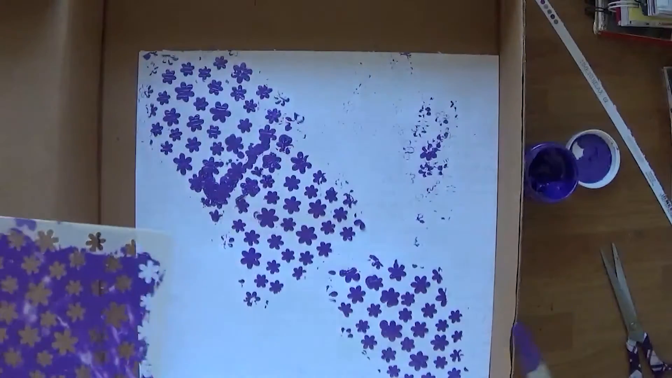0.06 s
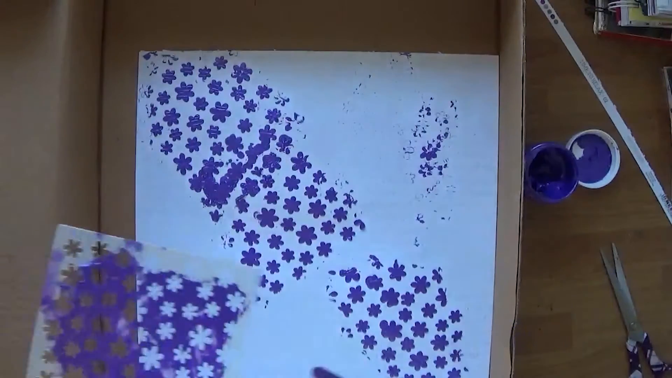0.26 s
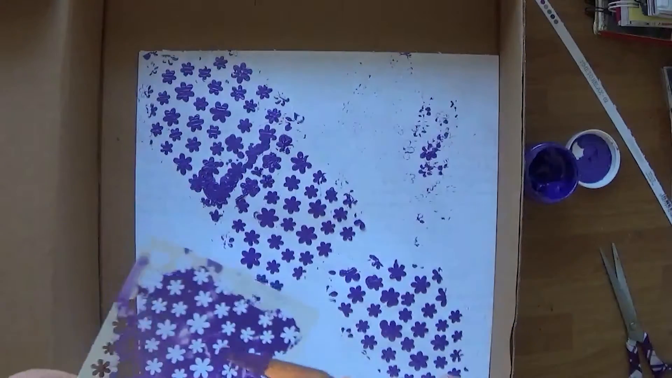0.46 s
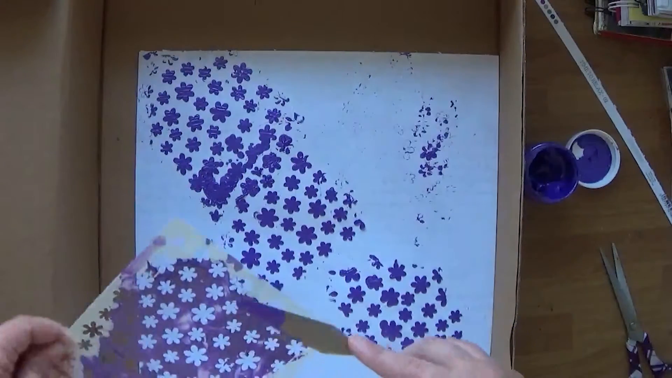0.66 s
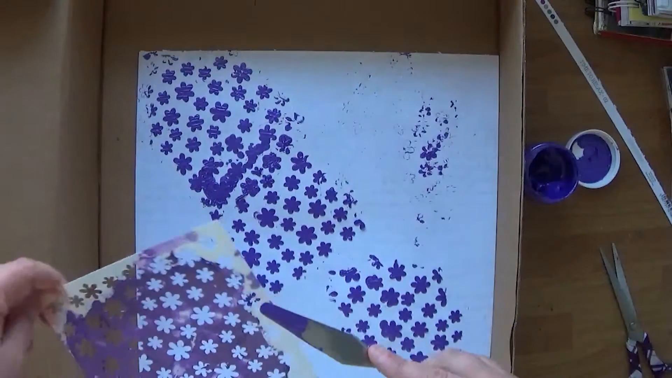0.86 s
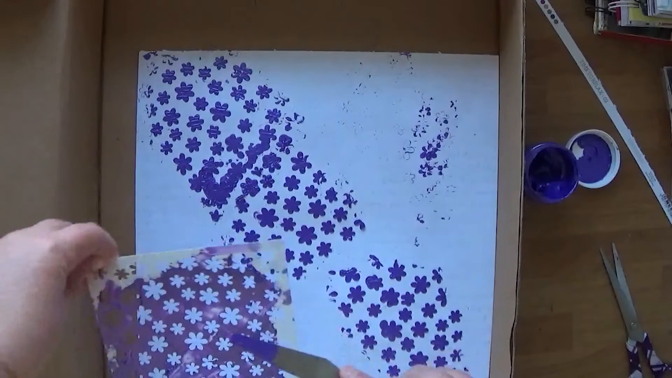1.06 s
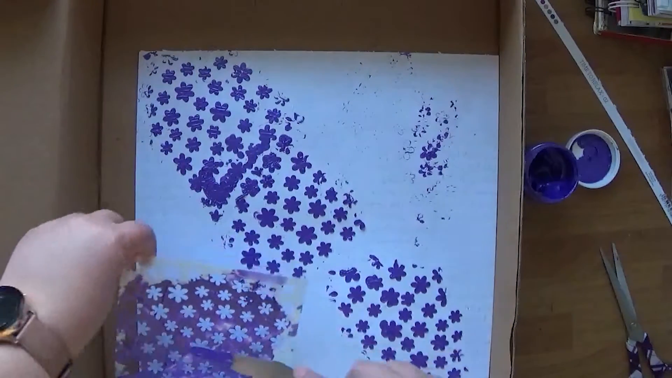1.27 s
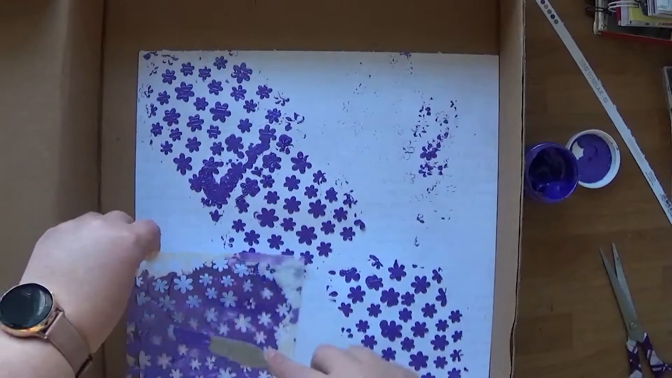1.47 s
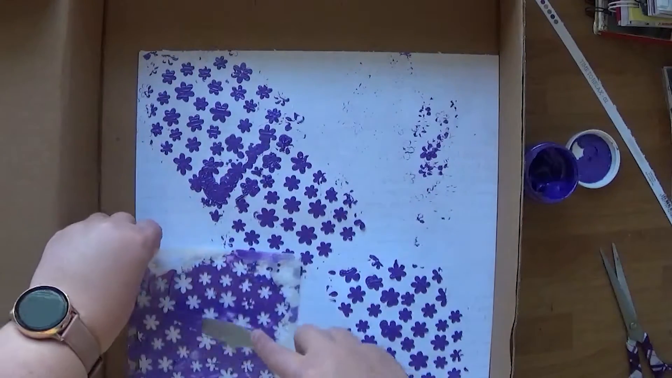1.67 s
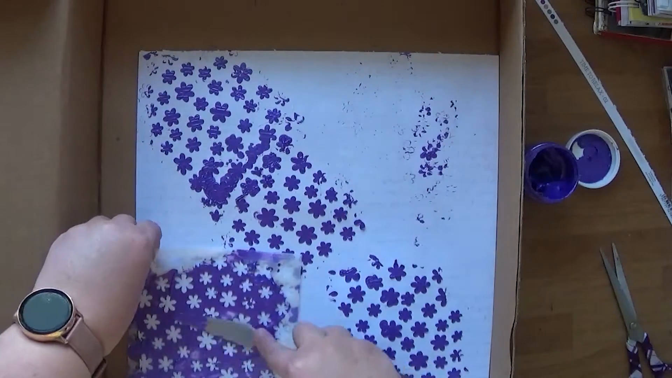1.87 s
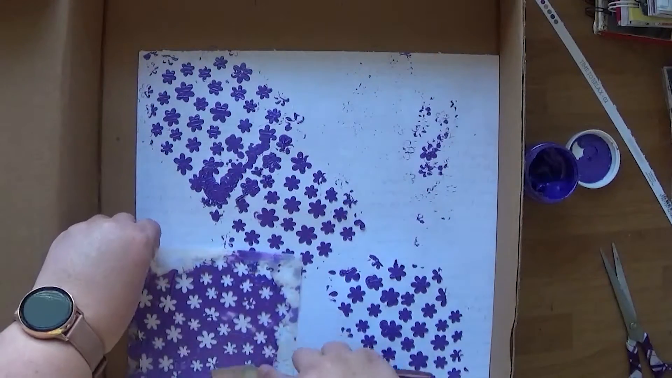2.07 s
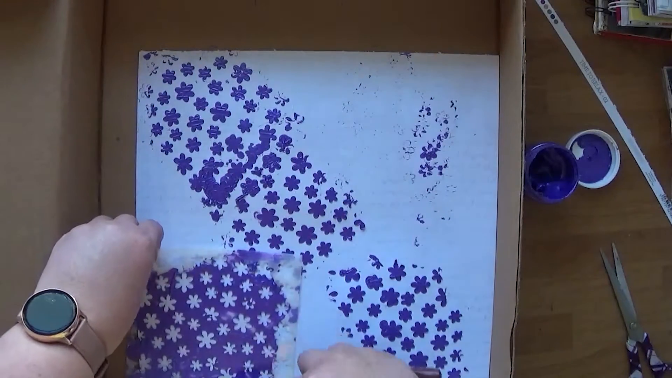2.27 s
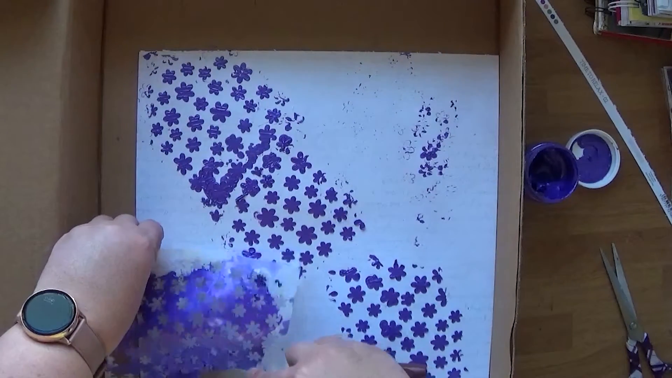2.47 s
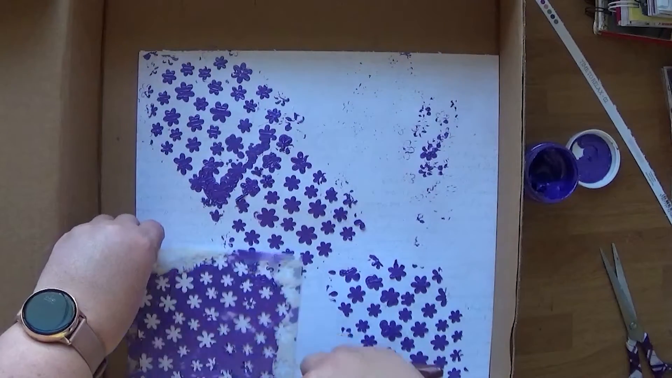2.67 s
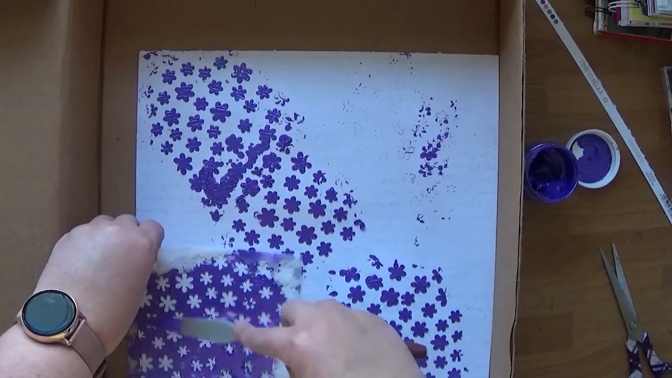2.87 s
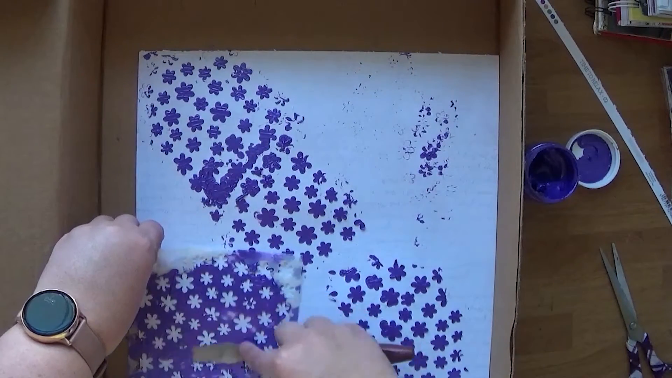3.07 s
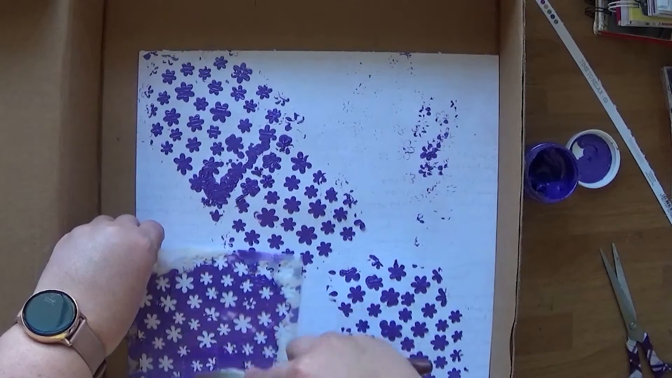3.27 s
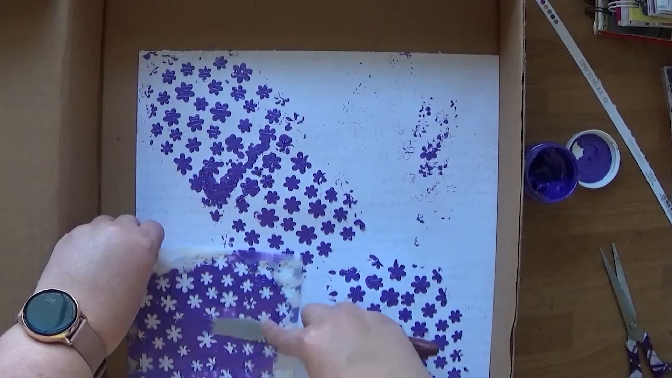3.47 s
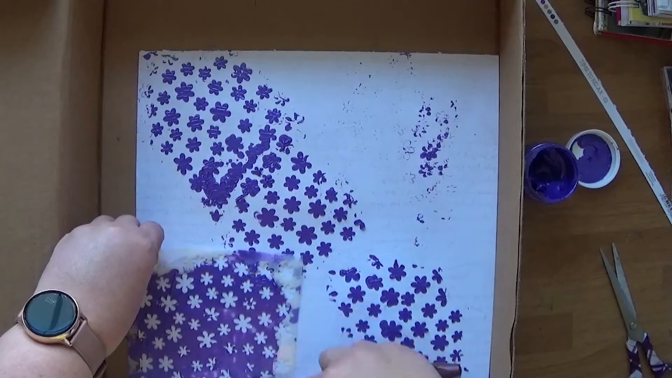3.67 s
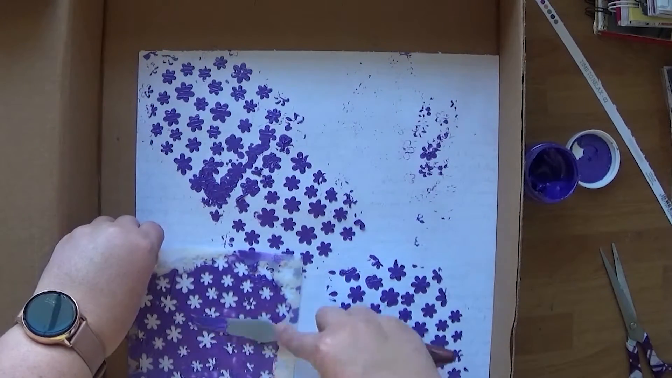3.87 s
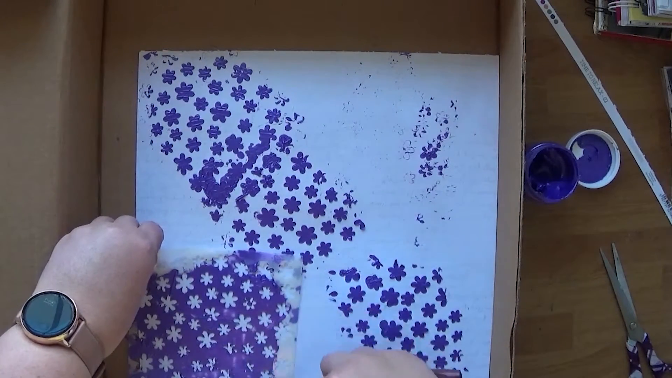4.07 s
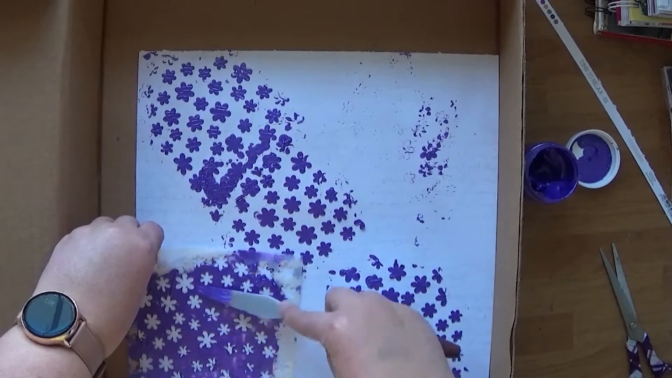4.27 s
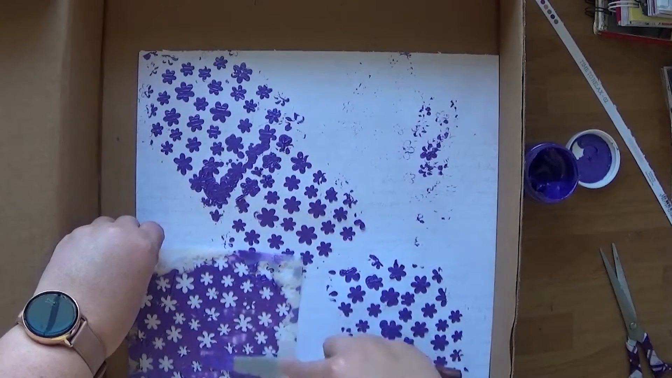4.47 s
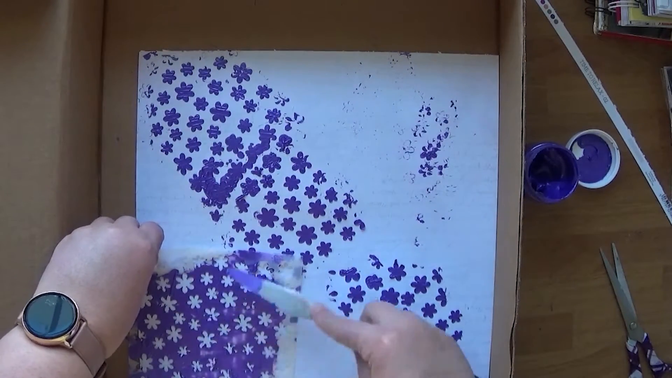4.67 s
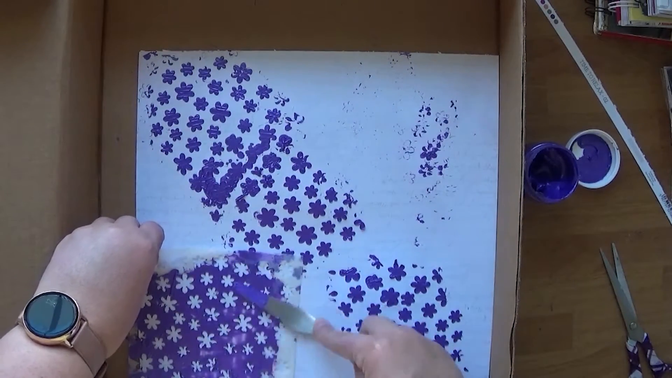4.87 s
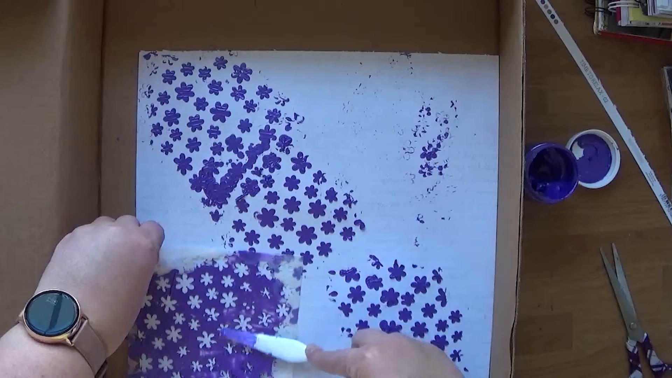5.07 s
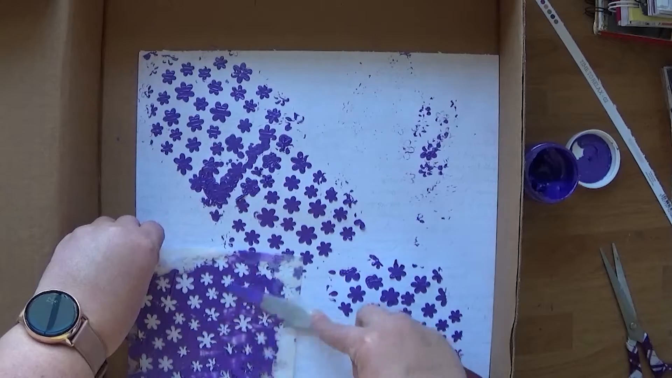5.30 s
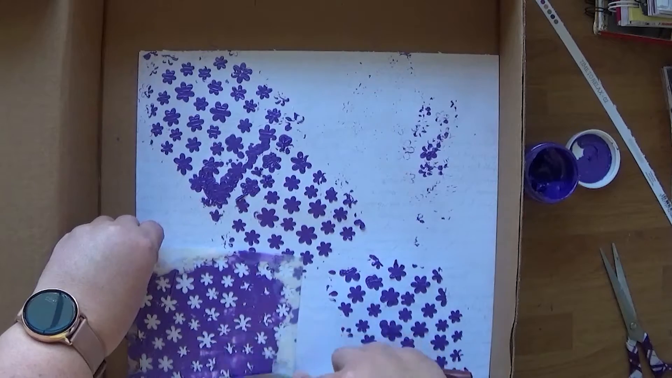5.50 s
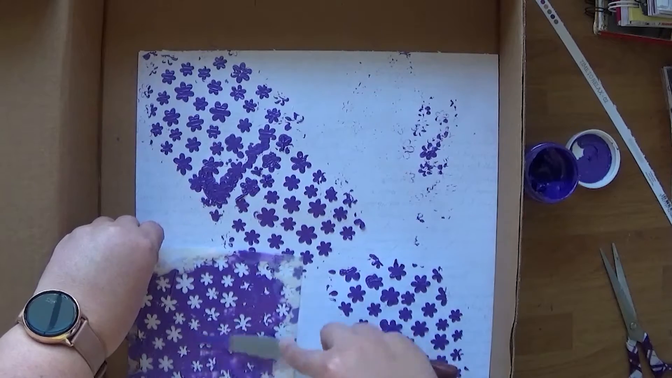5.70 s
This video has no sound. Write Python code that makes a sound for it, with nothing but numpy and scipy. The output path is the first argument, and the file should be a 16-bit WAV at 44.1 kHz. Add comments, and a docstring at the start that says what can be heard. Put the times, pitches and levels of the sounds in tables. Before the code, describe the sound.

A steady microphone hiss with a faint, rapidly pulsing buzz runs throughout and is all there is for the first second. At about 1.2 seconds a palette knife makes a light scrape over a plastic stencil on paper in a cardboard box. A longer, uneven stroke runs from 1.8 to 2.8 seconds. Near 2.7 seconds the sheet slides with one brief, faint squeak. Six shorter strokes follow, at about 3.1, 3.5, 4.0, 4.4, 4.9 and 5.4 seconds, stopping around 5.6. Each is a gritty hiss of steel and paste on plastic, dotted with sharp, slightly ringing clicks as the blade catches the cut-outs, over a hollow drumming from the cardboard. Soft low thuds of an arm on the table come irregularly from 1.3 seconds, the strongest near 2.6. Everything sounds close and nearly centred, with the short echo of a small room.

```python
"""A palette knife scrapes paste over a plastic stencil on paper in a cardboard box, under a camera.
First there is only the camera's hiss and faint buzz, which go on throughout. From 1.2 seconds the arm
thuds on the table and the blade makes eight strokes: it hisses over the plastic, clicks on the cut-outs
and drums the cardboard, and a small room answers. Near 2.7 seconds the sheet slides and squeaks once."""
import sys
import numpy as np
from scipy import signal
from scipy.fft import rfft, irfft, next_fast_len
from scipy.io import wavfile
from scipy.ndimage import map_coordinates

SR = 44100
rng = np.random.default_rng(int(sys.argv[2]) if len(sys.argv) > 2 else 0)


def inscribe(sig):
    """Save sig as 16-bit PCM at rate SR to the path in sys.argv[1].

    A 1-D sig is mono; a 2-D sig holds one channel per row.
    Samples are clipped to [-1, 1] before scaling.
    """
    pcm = np.round(np.clip(np.atleast_2d(sig).T, -1, 1) * 32767)
    wavfile.write(sys.argv[1], SR, pcm.astype(np.int16))


N = 253125
FRAMES_PER_SECOND, TOP_HZ = 29.97, 11150

# Microphone hiss. Each row: pitch in Hz, relative level in dB.
HISS_TONE = [(15, -43), (25, -12.5), (185, -1), (503, -5.5), (2280, -10), (2730, -8.5), (3190, -10.5),
             (3920, -11.5), (4450, -12.5), (10100, -18), (11500, -47), (15000, -61), (22000, -120)]
# Each row: pitch in Hz, how alike the left and right hiss are (1 is the same).
HISS_LIKENESS = [(60, 0.87), (170, 0.97), (490, 0.19), (1390, 0.073), (3950, 0.38), (11200, 0.84)]
# Camera buzz. Each row: pitch in Hz, typical peak in dB.
BUZZ_TONES = [(2770, -58), (4000, -71.5), (5400, -72)]
# Arm on the table. Each row: time in seconds, relative level in dB.
ARM_THUDS = [(1.2, -86), (1.36, -51), (1.44, -72), (1.81, -79), (1.98, -54), (2.07, -66), (2.2, -60),
             (2.29, -72), (2.39, -52), (2.49, -74), (2.56, -40.5), (2.73, -65), (2.78, -59), (2.97, -68),
             (3.07, -70), (3.42, -69), (3.47, -72), (3.58, -67), (3.87, -64), (3.93, -58), (4.03, -64),
             (4.28, -64), (4.44, -55), (4.52, -59.5), (4.6, -63), (4.84, -62), (4.89, -51.5), (5.13, -50.5),
             (5.27, -71), (5.41, -50.5), (5.74, -64)]
# One list a stroke. Each row: time in seconds, hiss and cardboard levels in relative dB,
# brightness (-3 or less is dull, 3 or more is sharp).
STROKE_SHAPES = [
    [(1.22, -64, -73, 0), (1.222, -72, -79, -6), (1.33, -45, -75, 1.5), (1.34, -49.5, -47, 2),
     (1.4, -69.5, -70, -2), (1.494, -64, -68, -2), (1.504, -73, -85, -5), (1.518, -64.5, -63, 2),
     (1.752, -71, -66, 0), (1.762, -66, -83, 4), (1.79, -71, -67, 0), (1.8, -62, -83, -2)],
    [(1.8, -74, -99, 4), (1.844, -67, -46, -2), (1.886, -70, -83, 2), (1.908, -44, -48.5, -3),
     (2.004, -56, -51, 3), (2.01, -32, -30.5, 12), (2.072, -46.5, -58.5, -1), (2.218, -45.5, -49.5, 3.5),
     (2.238, -38, -34.5, -2), (2.302, -59.5, -64, 0), (2.33, -39.5, -35, 0), (2.356, -64, -57, 4),
     (2.408, -29, -39.5, 2), (2.49, -46, -72, 4), (2.516, -42, -46, 3.5), (2.626, -36.5, -38, 2),
     (2.658, -52.5, -51, -4), (2.75, -41, -37, 5), (2.812, -67, -60.5, 0), (2.95, -67, -67, -2)],
    [(3.0, -69, -67, 0), (3.014, -71, -63, 2), (3.028, -57, -34.5, -3), (3.074, -42, -61, -2),
     (3.086, -42, -28.5, 5), (3.184, -39, -50, -1), (3.244, -42, -28.5, -2), (3.322, -73, -68, 0),
     (3.4, -67, -70, -3)],
    [(3.45, -73, -74, 0), (3.46, -71, -79, 8), (3.478, -63, -32.5, 4), (3.516, -45, -41, 4),
     (3.642, -38, -29.5, 0), (3.668, -55, -51, -6), (3.69, -40, -32.5, -3), (3.758, -61, -60, 6),
     (3.85, -70, -69, -4)],
    [(3.9, -66, -76, 0), (3.908, -75, -75, 3), (3.924, -43, -40.5, -3), (3.958, -45.5, -45, -9),
     (3.974, -42, -30, -5), (4.084, -41, -38.5, 0), (4.092, -41, -25.5, -10), (4.212, -62.5, -70.5, -2),
     (4.28, -62.5, -63, -13)],
    [(4.32, -64, -73, 0), (4.338, -66, -64, -2), (4.35, -41.5, -37.5, 0), (4.396, -56, -68, -6),
     (4.426, -41, -28.5, -8), (4.544, -42, -32.5, 0), (4.566, -64, -64, 0), (4.696, -70, -68, 0),
     (4.7, -60.5, -68, 5)],
    [(4.8, -71, -81, 3), (4.842, -43, -45.5, -7), (4.872, -63, -60, -3), (4.908, -40, -30.5, -2),
     (4.978, -44, -54, -1), (5.036, -30, -29.5, -3), (5.09, -61, -49, 3), (5.1, -31.5, -30, 1),
     (5.168, -33, -37, 2), (5.194, -54, -58, -6), (5.3, -64, -63, -3)],
    [(5.3, -68, -68, -7), (5.322, -62, -68, 0), (5.334, -46, -47, -2), (5.362, -58, -58, -2),
     (5.374, -34, -32.5, -2.5), (5.406, -34, -31.5, -1), (5.524, -38, -36, -1), (5.582, -57, -56, -17),
     (5.732, -68, -70, -2), (5.74, -58, -75, 0)],
]
# Rubbed plastic. Each row: pitch in Hz, relative level in dB.
PLASTIC_TONE = [(710, -28), (1200, -10.5), (1790, -9.5), (2460, -11), (3180, -7), (3560, -9.5),
                (8990, -10.5), (10800, -30), (11500, -46), (15000, -58), (22000, -120)]
# Cardboard notes. Each row: pitch in Hz, width in Hz, relative level in dB.
BOX_NOTES = [(235.7, 42, -10), (345, 49, 0), (483.4, 60, 3), (681, 67, -2.5), (899, 116, -3.5),
             (1089, 41, -5)]
# The blade catches an edge. Each row: start in seconds, strength in dB, ring in Hz,
# knock in dB relative to that strength, share of crack from 0 to 1.
CATCHES = [(1.276, -31, 6000, -27, 0.55), (1.3176, -27, 4800, -26, 0.55), (1.6754, -40, 1600, 4, 0.5),
           (1.8321, -28.5, 1710, -20, 0), (1.9092, -29, 1880, -23, 0.33), (1.9589, -18, 2320, -10, 0.6),
           (1.9691, -15, 2320, -5, 0.44), (2.0077, -11, 2220, -25, 0.77), (2.0392, -14, 4850, -37, 0.7),
           (2.1178, -24, 4980, -29, 0.8), (2.216, -39, 2440, -21, 0.7), (2.2303, -22, 1640, -12, 0.5),
           (2.2306, -14.5, 2610, -15, 0.53), (2.2684, -33, 2430, -14, 0.5), (2.3175, -25, 4480, -17, 0.46),
           (2.3277, -28.5, 1830, -15, 0.17), (2.3743, -27, 2900, -23, 0.63), (2.395, -5, 6100, -8, 0.69),
           (2.4078, -14, 2990, -26, 0.64), (2.4294, -27, 4020, -19, 0.5), (2.5074, -24.5, 2170, -12, 0.56),
           (2.6344, -19, 1920, -18, 0.48), (2.6758, -32, 1670, 1, 0.5), (2.7552, -19, 4800, -7, 0.65),
           (3.0265, -17.5, 2310, 0, 0.36), (3.0816, -3.5, 2490, -20, 0.46), (3.1075, -7.5, 2420, -15, 0.63),
           (3.136, -9.5, 3280, -35, 0.84), (3.1933, -20.5, 2850, -18, 0.26), (3.208, -7, 3180, -10, 0.52),
           (3.2331, -8.5, 4300, -29, 0.43), (3.474, -8, 2130, -18, 0.44), (3.5299, -2, 4640, -38, 0.5),
           (3.5516, -6.5, 2360, -29, 0.62), (3.599, -3.5, 2200, -33, 0.74), (3.6152, -8, 4420, -37, 0.52),
           (3.632, -17.5, 4500, -19, 0.12), (3.6372, -23, 1510, -15, 0.4), (3.6358, -3.5, 3250, -26, 0.54),
           (3.655, -7, 3060, -21, 0.6), (3.6633, -4, 5270, -38, 0.6), (3.6714, -6, 4200, -19, 0.6),
           (3.6847, -9, 4420, -17, 0.66), (3.7114, -21, 1700, -25, 0.44), (3.923, -25, 1830, 3.5, 0.5),
           (3.9691, -12.5, 1840, -17, 0.53), (3.9822, -9.5, 1700, -23, 0.6),
           (4.0025, -5.5, 2310, -24, 0.59), (4.0439, -6.5, 3270, -26, 0.5), (4.0655, -12, 3040, -26, 0.54),
           (4.0768, -16, 2860, -23, 0.5), (4.0874, -0.5, 3290, -25, 0.62), (4.1034, -6, 3100, -18, 0.7),
           (4.122, -15, 2490, -18, 0.58), (4.348, -22, 1860, -13, 0.54), (4.4109, -14, 2000, -27, 0.24),
           (4.4203, 0.5, 2970, -19, 0.57), (4.4408, -4, 3860, -26, 0.7), (4.4525, -5.5, 3360, -14, 0.44),
           (4.4654, -1, 4700, -21, 0.67), (4.509, -3.5, 3220, -29, 0.67), (4.5221, -10, 1770, -17, 0.55),
           (4.8254, -17.5, 1760, -12.5, 0.68), (4.8338, -21.5, 1570, -29, 0.85),
           (4.8846, -15, 2110, -19, 0.6), (4.8984, -21, 4500, -18, 0.4), (4.9042, -3, 4340, -20, 0.7),
           (4.9405, -11.5, 4230, -21, 0.55), (4.999, -16.5, 5900, -9, 0.52), (5.014, -19, 3970, -11, 0.6),
           (5.033, -16, 4410, 4, 0.58), (5.0934, -11, 5440, -22, 0.3), (5.1123, -13, 2950, -25, 0.48),
           (5.1468, -4.5, 1790, -24, 0.59), (5.1503, -4.5, 2720, -30, 0.54), (5.3298, -33, 1850, -15, 0.3),
           (5.352, -36, 2280, -17, 0.6), (5.3641, -17, 1560, -15, 0.43), (5.373, -8.5, 3280, -20, 0.66),
           (5.4056, -6.5, 3270, -13, 0.59), (5.441, -4, 3160, -36, 0.66), (5.4675, -10.5, 4980, -13, 0.38),
           (5.4675, -8.5, 1840, -23, 0.57), (5.4961, -7, 2830, -12, 0.56), (5.5144, -10, 3340, -26, 0.45),
           (5.5488, -13.5, 3020, -27, 0.39), (5.6106, -24, 2720, -28, 0.7)]
# Steel notes. Each row: pitch in Hz, relative level in dB, seconds to fade by 60 dB.
BLADE_NOTES = [(1384, -12.5, 0.2), (1545, -14.5, 0.25), (2718, -4.5, 0.19), (3953, 1, 0.083),
               (5380, -7, 0.17), (6590, -2.5, 0.11)]
# The sheet shifts. Each row: time in seconds, thud in dB, squeak in dB.
SHEET_SLIDE = [(2.45, -68, -59), (2.478, -83, -64), (2.59, -61, -54), (2.664, -58, -51), (2.722, -61, -33),
               (2.77, -55, -38), (2.796, -56, -70), (2.924, -70, -83), (2.95, -68, -72)]
# Each row: pitch in Hz, how much louder the left side is in dB.
LEFT_LOUDER = [(60, -2), (110, 0.5), (190, -0.5), (340, -1.5), (610, -2), (1100, -1.5), (1960, 0.5),
               (3510, -1), (6280, 2.5), (11200, -2.5)]
# Each row: pitch in Hz, how far the left wave is ahead in radians.
LEFT_AHEAD = [(0, 0), (1210, 0.43), (3270, 0.27), (7490, 0.0), (11400, 0.06)]
# Room echo. Each row: pitch in Hz, seconds to fade by 60 dB.
ROOM_FADE = [(200, 0.21), (2000, 0.21), (10000, 0.13)]


def amp(db):
    return 10 ** (np.asarray(db) / 20)


def unit(x):
    return x / np.sqrt(np.mean(x ** 2) + 1e-20)


def along(points, hz):
    """Look up a table's value at any pitch."""
    pitches, values = np.transpose(points)
    return np.interp(np.log(hz + 1), np.log(pitches + 1), values)


def curves(rows):
    """Each column as a curve in time; silent outside the rows."""
    times, *columns = np.transpose(rows)
    return [np.interp(np.arange(N) / SR, times, c, left=-120, right=-120) for c in columns]


def wobble(rate):
    """A smooth curve through `rate` random points a second."""
    return map_coordinates(rng.standard_normal(int(N * rate / SR) + 4), [np.arange(N) * rate / SR])


def filtered(x, response):
    """Turn each pitch in x up or down."""
    size = next_fast_len(N + SR // 2)
    return irfft(rfft(x, size) * response(np.fft.rfftfreq(size, 1 / SR)), size)[..., :N]


def ringing(notes):
    """The response of a thing that rings at these notes."""
    return lambda f: sum((-1) ** k * amp(db) * 1j * f * width / (hz * hz - f * f + 1j * f * width)
                         for k, (hz, width, db) in enumerate(notes))


def grit(rate, spread_db):
    """Noise made of tiny slips of very unequal size."""
    return unit(rng.standard_normal(N) * amp(spread_db * wobble(rate)))


def camera_hiss():
    """The two microphones hiss steadily, partly alike."""
    def tone(hz):
        angle = np.arccos(np.clip(along(HISS_LIKENESS, hz), -1, 1)) / 2
        return amp(along(HISS_TONE, hz)) * [np.cos(angle), np.sin(angle)]
    mid, side = filtered(rng.standard_normal((2, N)), tone)
    return amp(-62) * unit(np.array([mid + side, mid - side]))


def camera_buzz():
    """The camera buzzes briefly once a frame."""
    frames = (np.arange(N) / SR - .0255) * FRAMES_PER_SECOND
    offset = (frames - np.round(frames)) / FRAMES_PER_SECOND
    pulses = np.exp(-(offset / 0.0032) ** 2) * amp(1.4 * wobble(28))
    return pulses * sum(amp(db) * np.sin(2 * np.pi * hz * offset + 0.43 * wobble(100))
                        for hz, db in BUZZ_TONES)


def arm_thuds():
    """The arm's weight makes the table thud."""
    rumble = unit(filtered(grit(22, spread_db=5.5), ringing([(66, 35, -12.5), (176, 110, 1.5)])))
    return amp(curves(ARM_THUDS)[0] - 5.5) * rumble


def rubbing():
    """Slips on the plastic hiss; the drag shakes the cardboard under it."""
    hiss_db, box_db, brightness = curves(np.vstack(STROKE_SHAPES))
    slips = grit(900, spread_db=7.5) * amp(3.4 * wobble(65))
    dull = unit(filtered(slips, lambda f: amp(along(PLASTIC_TONE, f) - 1.8 * np.log2(f / 4000 + .018))))
    sharp = unit(filtered(slips, lambda f: amp(along(PLASTIC_TONE, f) + 2.6 * np.log2(f / 4000 + .01))))
    share = np.clip(.5 + brightness / 6, 0, 1)
    box = unit(filtered(grit(120, spread_db=3.5), lambda f: ringing(BOX_NOTES)(f) / (1 + 1j * f / 3000)))
    return amp(hiss_db) * (share * sharp + (1 - share) * dull) + amp(box_db - 2) * box


def edge_clicks():
    """Each catch cracks, rings the plastic and the blade, and knocks the box."""
    clicks, knocks, t = np.zeros(N + SR), np.zeros(N), np.arange(SR // 8) / SR
    for start, db, hz, knock_db, share in CATCHES:
        noise = np.diff(rng.standard_normal(len(t) + 1))
        crack = noise * (amp(-60 * t / 0.0038) + 0.16 * amp(-60 * t / 0.036))
        ring = np.sin(2 * np.pi * hz * t) * amp(-60 * t / 0.0073) * (1 - np.exp(-t / 0.000081))
        steel = sum(amp(level + rng.normal(0, 4.6) - 60 * t / fade) * np.sin(2 * np.pi * f * t)
                    for f, level, fade in BLADE_NOTES)
        click = 0.67 * share * crack + 1.284 * (1 - share) * ring + amp(-33.5) * steel
        at = round(start * SR)
        clicks[at:at + len(t)] += amp(db) * click
        knocks[at] = amp(db + knock_db + 18)
    return clicks[:N] + filtered(knocks, ringing(BOX_NOTES))


def sheet_slide():
    """The hand shifts the sheet: it squeaks and the table thuds."""
    thud_db, squeak_db = curves(SHEET_SLIDE)
    squeak = unit(filtered(grit(60, spread_db=10), ringing([(893, 97, 0)])))
    thud = unit(filtered(rng.standard_normal(N), ringing([(88, 18, 0)])))
    return amp(squeak_db) * squeak + amp(thud_db) * thud


def room(x):
    """Each short stretch gets its own soft echo; high pitches die first."""
    out, step, delay = np.zeros((2, N + SR)), SR // 8, 90
    for at in range(0, N, step):
        hz, t, noise = signal.stft(rng.standard_normal((2, SR // 3)), SR, nperseg=128)
        noise[1] = 0.77 * noise[0] + 0.78 * noise[1]  # right is partly like left
        fade = amp(-60 * t / along(ROOM_FADE, hz)[:, None])
        tail = signal.istft(noise * fade, SR, nperseg=128)[1]
        echo = signal.fftconvolve(x[None, at:at + step], tail / np.linalg.norm(tail[0]), axes=1)
        out[:, at + delay:at + delay + echo.shape[1]] += echo
    return out[:, :N]


def scene():
    """The work sits a little to one side of the two microphones."""
    work = rubbing() + edge_clicks() + sheet_slide() + arm_thuds()
    sides = np.array([[.5], [-.5]])
    direct = filtered(work, lambda hz: amp(sides * along(LEFT_LOUDER, hz))
                      * np.exp(1j * sides * along(LEFT_AHEAD, hz)))
    return direct + amp(-5) * room(work) + camera_hiss() + camera_buzz()


def record(dry):
    """The camera keeps almost nothing above TOP_HZ."""
    return filtered(dry, lambda hz: np.where(hz < TOP_HZ, 1, amp(-26 - 14 * (hz - TOP_HZ) / 1000)))


dry = scene()
out = record(dry)
inscribe(out)
```